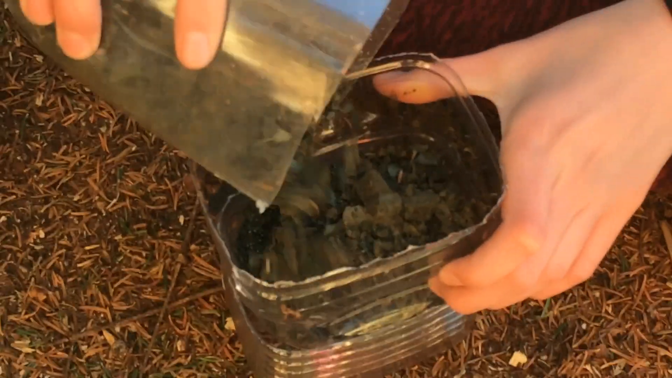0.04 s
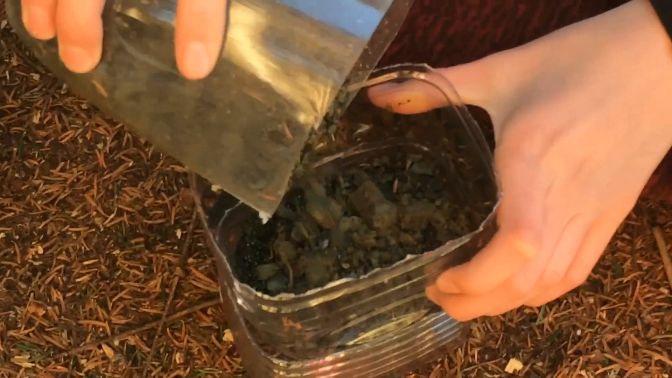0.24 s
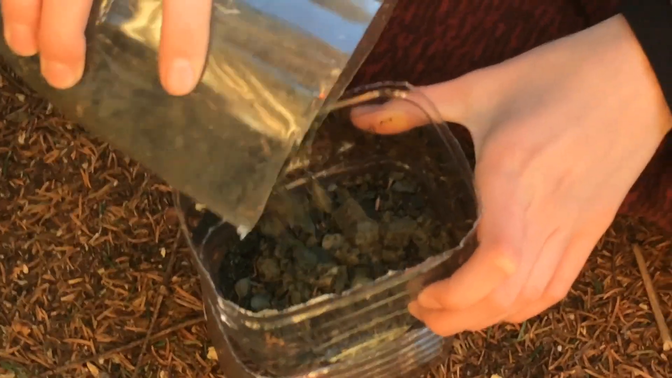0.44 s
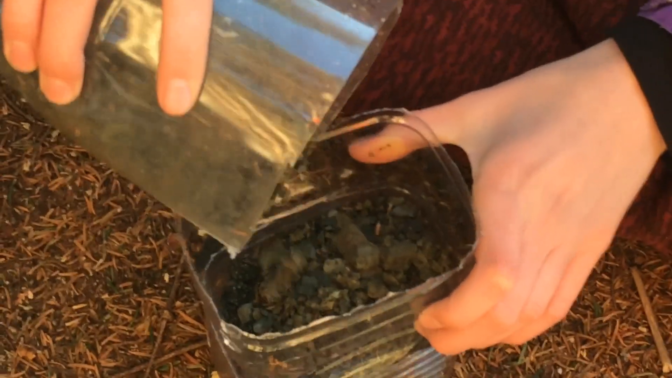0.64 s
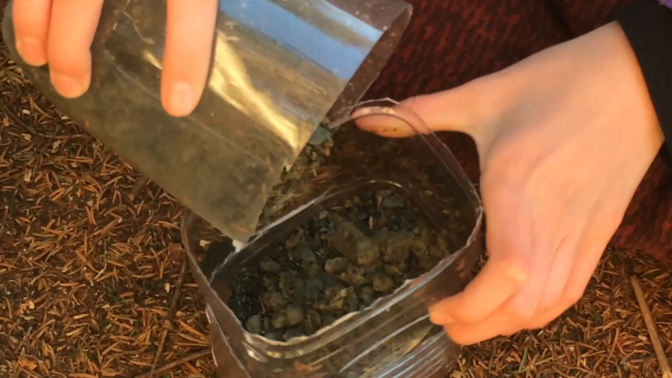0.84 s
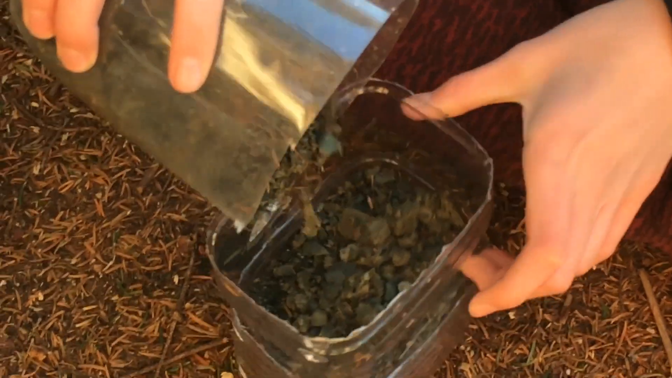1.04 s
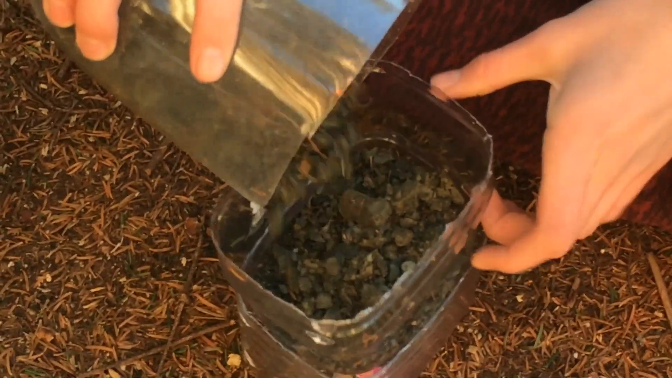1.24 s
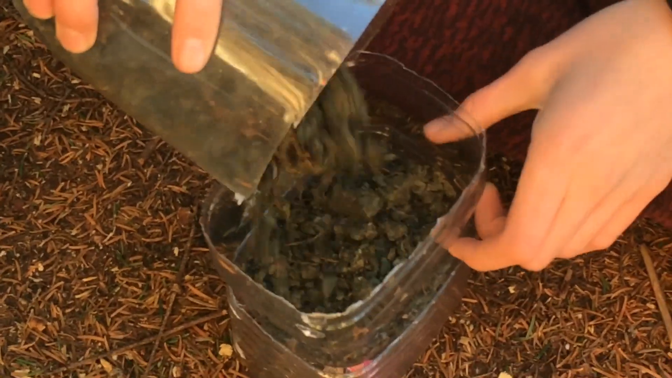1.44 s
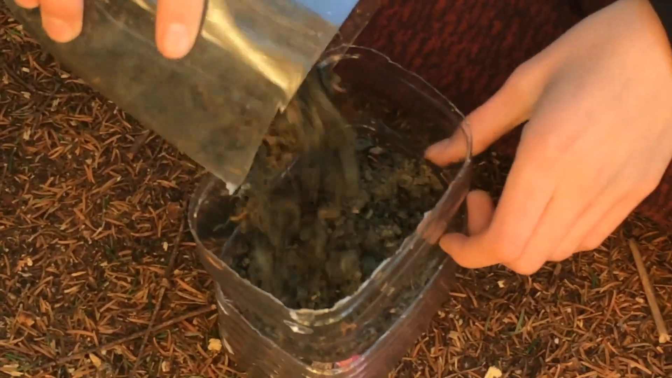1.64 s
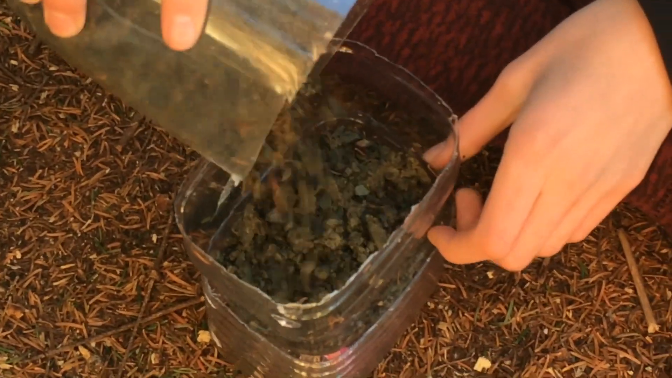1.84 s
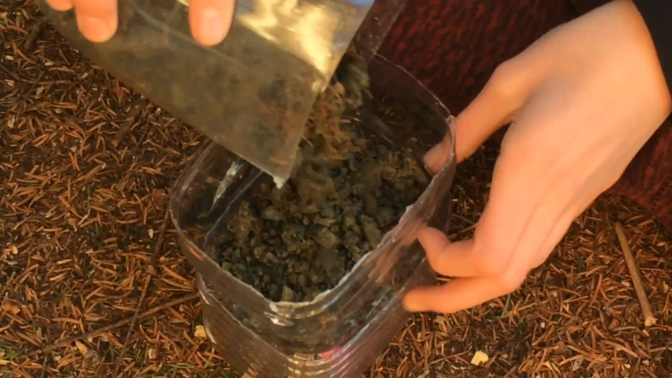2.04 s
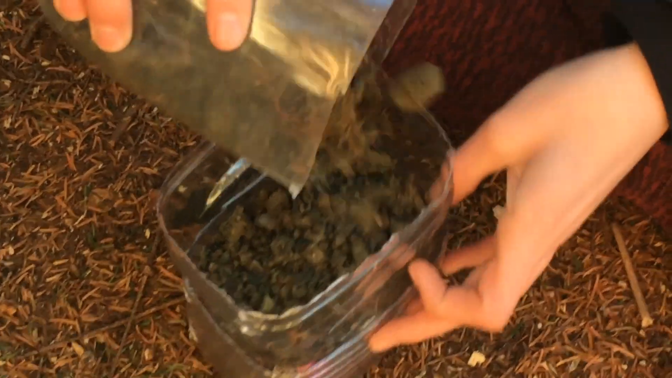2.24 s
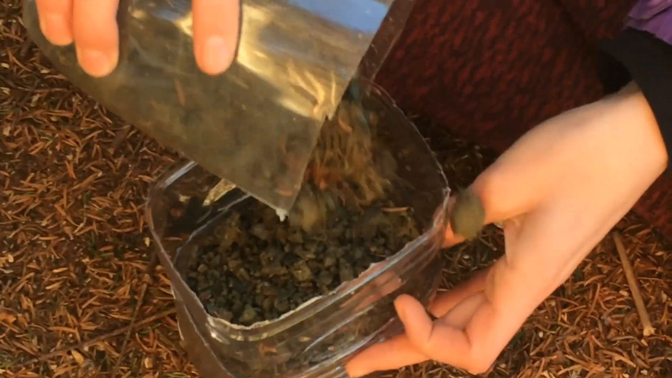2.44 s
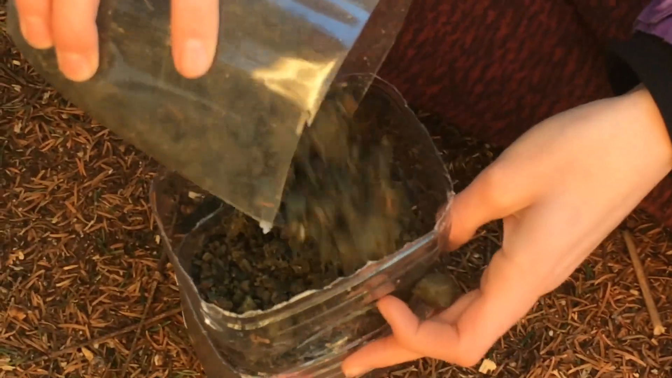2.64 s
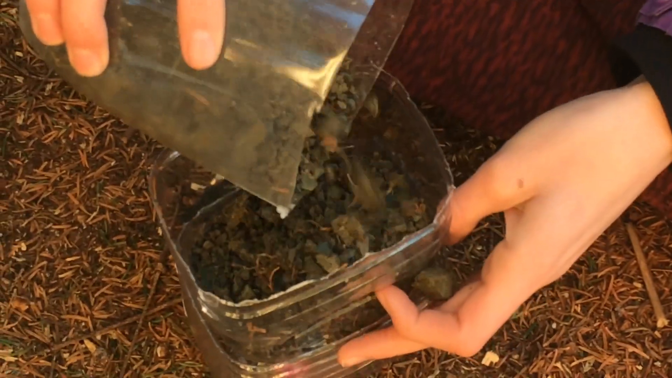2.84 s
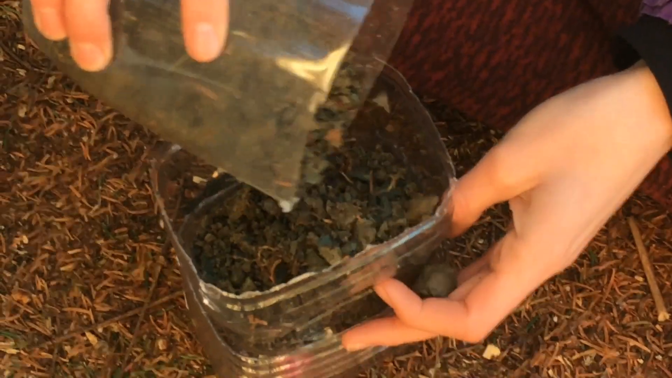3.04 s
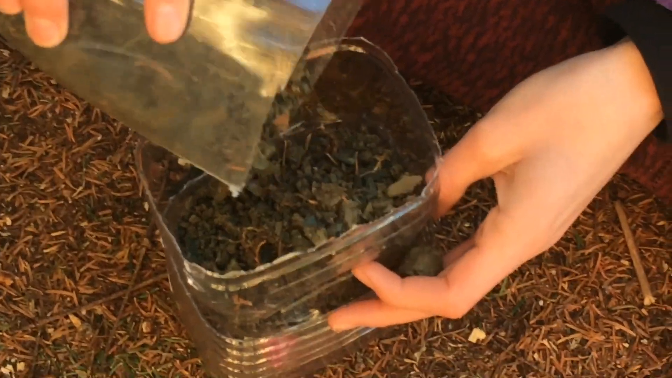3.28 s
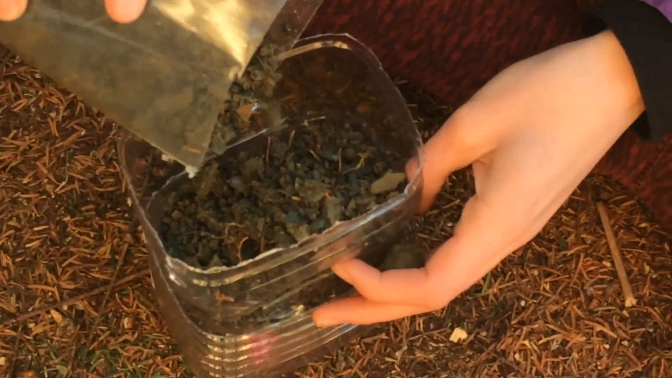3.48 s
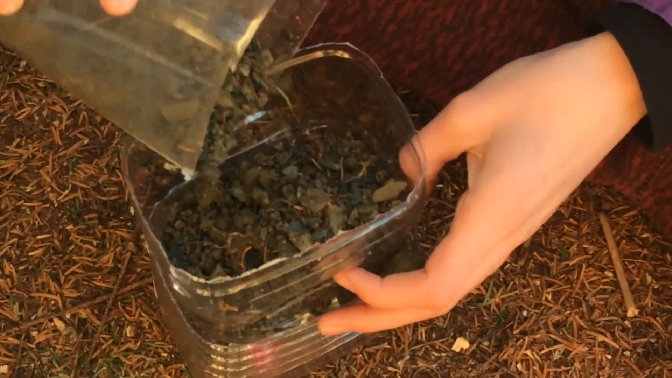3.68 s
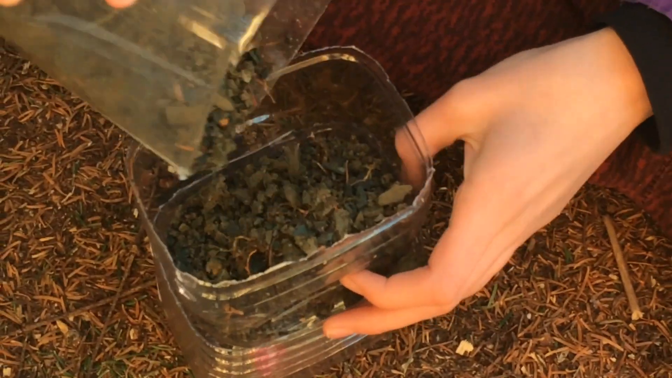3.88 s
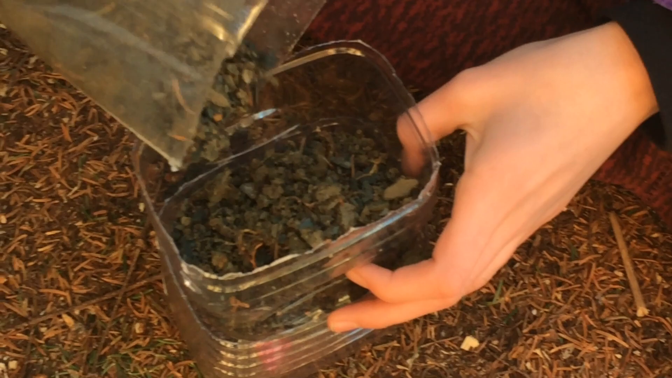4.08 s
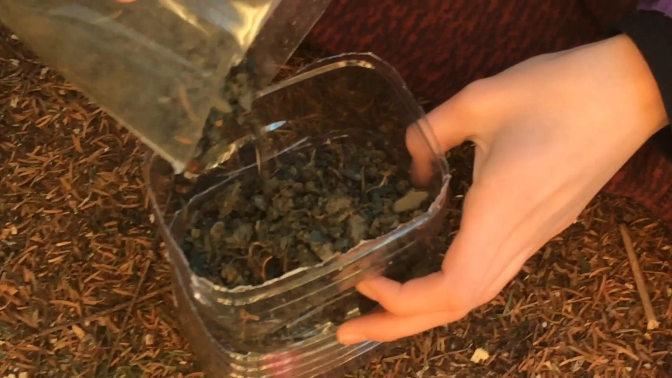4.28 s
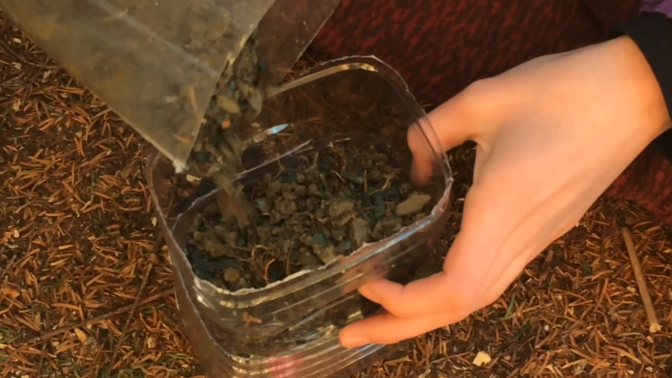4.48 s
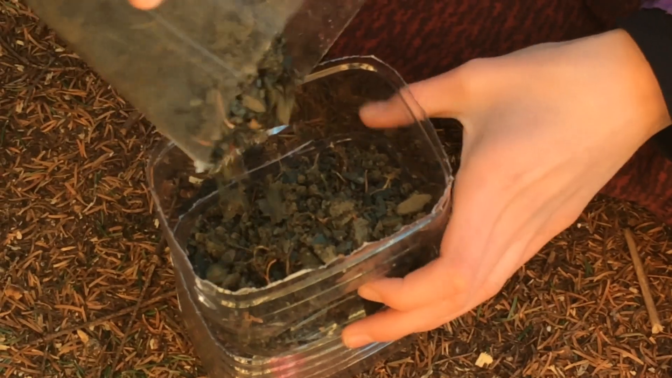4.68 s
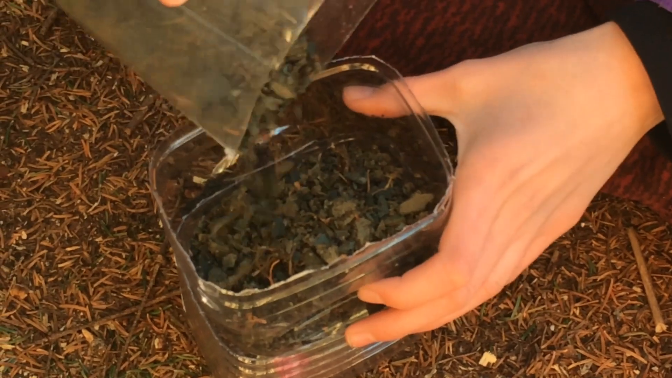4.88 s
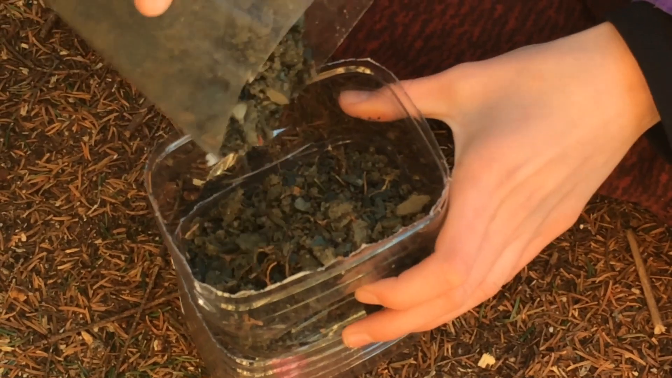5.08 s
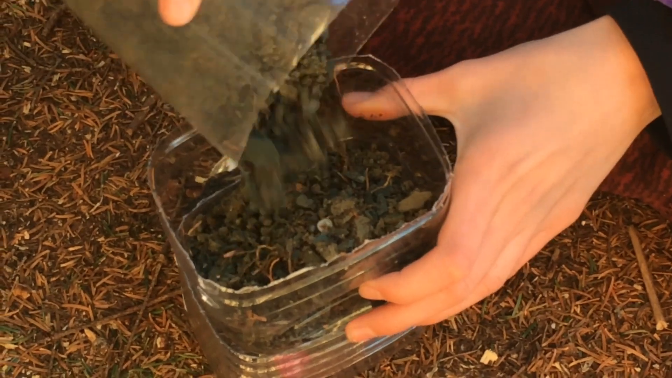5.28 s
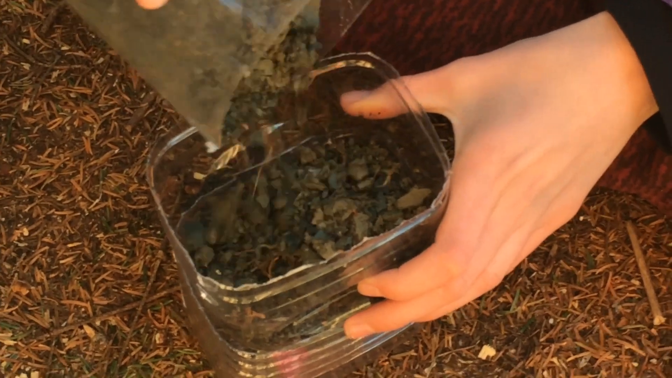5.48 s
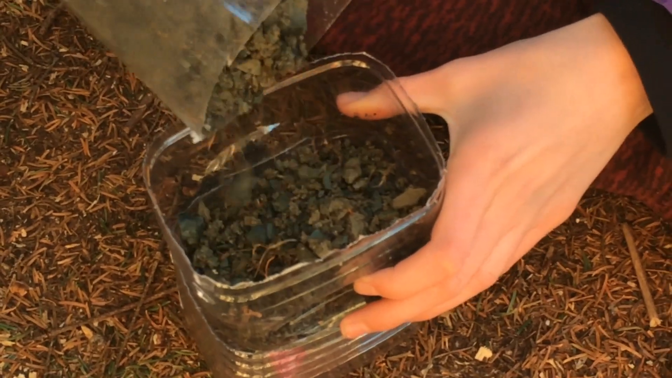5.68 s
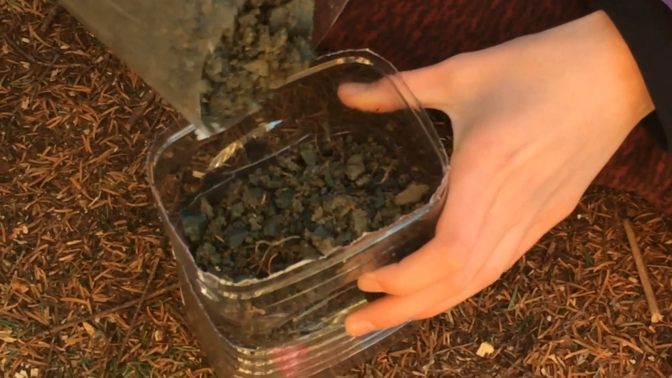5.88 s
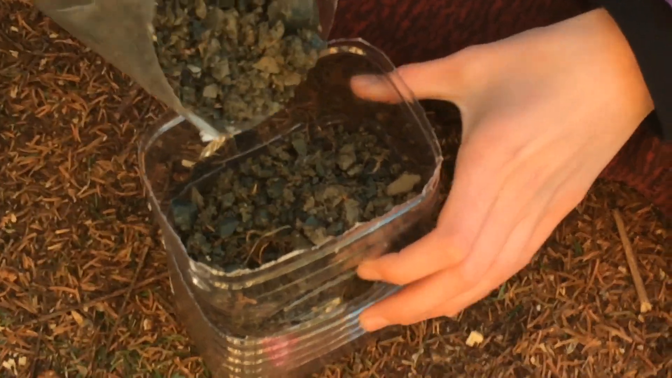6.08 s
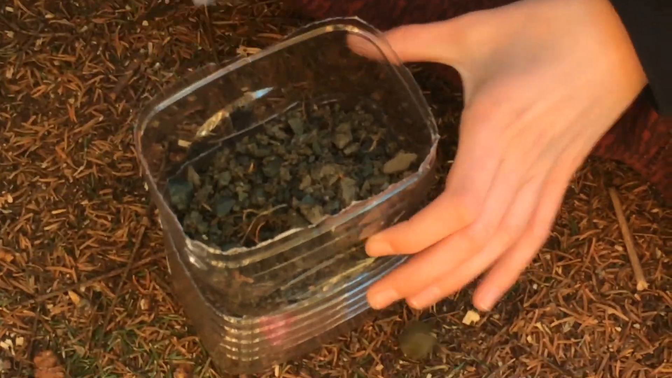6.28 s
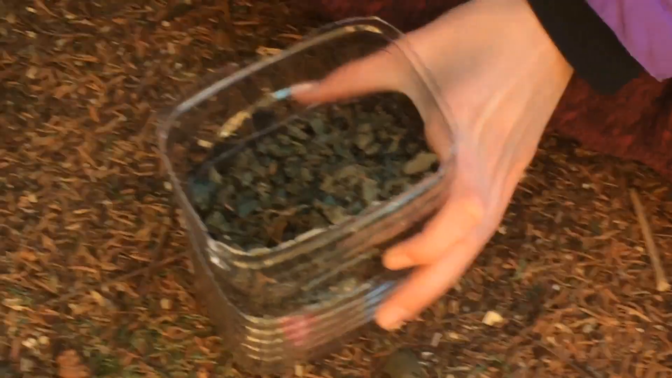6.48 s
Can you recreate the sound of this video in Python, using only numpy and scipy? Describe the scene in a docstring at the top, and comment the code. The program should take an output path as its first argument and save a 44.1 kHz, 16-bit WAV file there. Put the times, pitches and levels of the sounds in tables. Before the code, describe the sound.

Close, dry and mono outdoors, with a faint steady hush, slight low wind flutter and a few soft microphone thumps, mostly in the first second. Gravel falls into a thin-walled plastic container. From 0 to 0.6 s, bright ticks and small grit lead to a rap near 0.2 and a strong, hollow plastic clack at 0.53. It thins, with a lone knock at 0.9. Around 1.4 s the flow swells into a dense, crunchy rush of grit, raps and knocks lasting to about 3.0, with the loudest, boomy pebble knock at 2.36 and bright slides near 2.7 and 2.8. From 3.1 to 5.2 only sparse ticks, weak taps and a thin sandy trickle remain. Grit picks up at 5.3, and a tight cluster of hollow raps bursts at 5.55-5.65. Then scattered taps, a dull knock at 6.2, and a faint last trickle to about 6.5.

```python
"""Gravel poured into a bottle

Gravel is shaken out of a plastic bag into a cut-off plastic bottle that stands on the forest floor.
Single stones tick as filtered noise bursts, and rap the thin walls and knock the body as struck modes.
Fine grit runs between them in surges, as random showers of the same sounds with smooth noise for sand.
Light wind gives a low noise flutter; bumps on the microphone give separate soft low thumps, as short pulses.
Shaped noise lies behind it all as a steady hush."""
import sys
import numpy as np
from scipy import signal
from scipy.fft import rfft, irfft, next_fast_len
from scipy.io import wavfile
from scipy.ndimage import uniform_filter1d

SR = 44100
rng = np.random.default_rng(int(sys.argv[2]) if len(sys.argv) > 2 else 0)


def master_out(mix):
    """Clip the mix to full scale and print it as 16-bit PCM to the path in sys.argv[1]."""
    frames = np.transpose(np.atleast_2d(mix))
    ceiling = np.clip(frames, -1, 1)
    pcm = np.round(ceiling * 32767).astype(np.int16)
    wavfile.write(sys.argv[1], SR, pcm)


N = 287620

# Colour of stone on stone. Each row: frequency in Hz, relative level in dB.
STONE_COLOUR = [(150, -99), (1000, -13), (2800, -2.5), (5000, 1), (7200, -0.5), (9500, -5), (13000, -6),
                (16000, -14.5)]
STONE_S = .005  # a blow has the energy of an rms of 1 held this long (s)
RING_T = np.arange(3072) / SR  # time axis of one blow (s)
ROCKING_S = .0007  # spacing of the lumps as a stone settles (s)
CUTOFF_HZ = 16100


def from_db(db):
    """Decibel law: amplitude ratio of a level in dB."""
    return 10 ** (np.asarray(db) / 20)


def rms_one(x):
    """Power normalization: scales a sound to an rms of 1."""
    return x / np.sqrt(np.mean(x ** 2) + 1e-20)


def unit_blow(x):
    """Energy normalization: gives a short sound the energy of an rms of 1 held for STONE_S."""
    return x * np.sqrt(STONE_S * SR / (np.sum(x ** 2) + 1e-20))


def in_time(rows):
    """Linear interpolation: the columns of a curve table at every sample."""
    s, *columns = np.transpose(rows)
    return [np.interp(np.arange(N) / SR, s, c) for c in columns]


def gain_at(points, size):
    """Spectral envelope: gain of a (Hz, dB) spectrum on the bins of an FFT."""
    hz, db = np.transpose(points)
    bin_hz = np.arange(size // 2 + 1) * SR / size
    return from_db(np.interp(np.log(bin_hz + 1), np.log(hz), db))


def causal(x, gain):
    """Minimum-phase filtering by the folded cepstrum: nothing sounds before the contact."""
    cepstrum = irfft(np.log(gain))
    cepstrum[1:] *= 2
    cepstrum[len(cepstrum) // 2:] = 0
    return irfft(rfft(x) * np.exp(rfft(cepstrum)))


def noise(spectrum):
    """Spectral shaping: smooth noise of the given colour, at an rms of 1."""
    size = 2 * next_fast_len(N // 2 + 1)
    white = rng.standard_normal(size)
    return rms_one(irfft(rfft(white) * gain_at(spectrum, size))[:N])


def background_hush(hush_db):
    """Stationary noise: a steady background hush, with a slight bump near 2 kHz."""
    # Colour of the hush. Each row: frequency in Hz, relative level in dB.
    hush_colour = [(30, -16), (90, -3.5), (600, -5.5), (1600, -13.5), (2100, -8), (2800, -16.5),
                   (15000, -24)]
    return from_db(hush_db) * noise(hush_colour)


def wind(low_hz=45, high_hz=130):
    """Band-limited noise of varying level: light wind gives a low flutter."""
    # Level of the flutter. Each row: time in seconds, level in dB.
    flutter_level = [(0, -58), (.2, -74), (.45, -59), (.78, -66), (.87, -72), (1.45, -65.5), (3, -68),
                     (4.9, -81), (5.3, -64), (6, -73), (6.2, -78)]
    band = signal.butter(2, [low_hz, high_hz], "band", fs=SR, output="sos")
    flutter = rms_one(signal.sosfilt(band, rng.standard_normal(N)))
    return from_db(in_time(flutter_level)[0]) * flutter


def microphone_bumps(thump_s=0.0029):
    """Short low-frequency pulses: soft thumps from bumps on the microphone, each a sine in a bell envelope."""
    # Each row: centre in seconds, frequency of the sine in Hz, level of its envelope in dB.
    thump_rows = [(.03, 74, -40), (.322, 75, -44), (0.41, 87, -26), (.46, 70, -45), (0.559, 96.4, -31.5),
                  (.713, 70, -43.5), (1.199, 69.4, -48), (1.48, 130, -47), (2.675, 162, -39),
                  (5.895, 69.6, -51), (6.041, 65, -52), (6.467, 152, -42.5)]
    t = np.arange(N) / SR
    out = np.zeros(N)
    for s, hz, db in thump_rows:
        envelope = from_db(db) / np.cosh(np.clip((t - s) / thump_s, -20, 20))
        out += envelope * np.sin(2 * np.pi * hz * (t - s))
    return out


def dying(t60):
    """Exponential decay: amplitude falls by 60 dB in t60 seconds."""
    return from_db(-60 * RING_T / t60)


def scatter(t60, lumpy_db, lump_s):
    """Irregular decay: noise that dies away in uneven lumps, like a stone rocking to rest."""
    knots = np.arange(0, RING_T[-1], lump_s)
    lumps = np.interp(RING_T, knots, np.clip(rng.standard_normal(len(knots)), -2, 2))
    return rng.standard_normal(len(RING_T)) * dying(t60) * from_db(lumpy_db * lumps)


def contact(grind, grind_t60):
    """Contact force: a rough stone gives one impulse, then grinds briefly as it settles."""
    force = grind * unit_blow(scatter(grind_t60, lumpy_db=3.5, lump_s=ROCKING_S))
    force[0] += np.sqrt(STONE_S * SR)
    return force


def struck(modes, spread_db, detune, force, low_hz):
    """Modal excitation: where a stone lands decides how strongly, and at what pitch, each mode answers."""
    chance = rng.uniform(-1, 1, (len(modes), 3))
    ring = np.zeros(len(RING_T))
    for (hz, db, t60), (place, load, side) in zip(modes, chance):
        amplitude = np.sign(side) * from_db(db + spread_db * place)
        ring += amplitude * dying(t60) * np.sin(2 * np.pi * hz * (1 + detune * load) * RING_T)
    # the bottle is too small to radiate deep bass
    radiator = signal.butter(3, low_hz, "high", fs=SR, output="sos")
    driven = signal.fftconvolve(ring, force)[:len(RING_T)]
    return unit_blow(signal.sosfilt(radiator, driven))


def thud():
    """Lowest mode under load: the bottom gives under the heap."""
    # The loaded bottom. Each row: nominal frequency in Hz, level in dB, t60 in seconds.
    bottom_modes = [(260.3, 0, 0.041)]
    force = contact(grind=0, grind_t60=STONE_S)
    return struck(bottom_modes, spread_db=0, detune=0.16, force=force, low_hz=224)


def knock():
    """Damped body resonance: the hollow bottle booms briefly."""
    # The hollow body. Each row: nominal frequency in Hz, relative level in dB, t60 in seconds.
    body_modes = [(552, 0, .045), (612, 0, .052)]
    force = contact(grind=.5, grind_t60=.022)
    return struck(body_modes, spread_db=9.5, detune=0.056, force=force, low_hz=454)


def rap(heavy=0, dull_db=6.0):
    """Contact time and brightness: a heavy stone (1) stays on the wall longer than a light one (-1), so duller."""
    # Thin ribbed walls. Each row: nominal frequency in Hz, relative level in dB, t60 in seconds.
    wall_modes = [(414, -16, 0.055), (774, -6, 0.045), (847, 3, 0.022), (979, 2, 0.015), (1272, 3.5, 0.013),
                  (1390, 2.5, 0.017), (1740, 6.5, 0.012), (2095, -1, 0.014), (2490, -11, 0.018),
                  (2646, 0, 0.022), (3320, 8.5, 0.0016)]
    lowest_hz = wall_modes[0][0]
    # dull_db is the tilt in dB per octave at heavy = 1
    modes = [(hz, db - dull_db * heavy * np.log2(hz / lowest_hz), t60) for hz, db, t60 in wall_modes]
    force = contact(grind=0.73, grind_t60=0.047)
    # every mode comes as a close pair
    return struck(modes * 2, spread_db=5.5, detune=0.072, force=force, low_hz=460)


def tick(small, tail_db, bright_db=12.0, peak_db=7.5, width_hz=260):
    """Impact spectrum: a crack and short scatter at each stone's own pitches, brighter for small ones (0-1)."""
    crack_t60, scatter_t60 = .0028, .022  # s
    crack = rng.standard_normal(len(RING_T)) * dying(crack_t60)
    burst = crack + from_db(tail_db) * scatter(scatter_t60, lumpy_db=11.0, lump_s=ROCKING_S)
    hz = np.arange(len(RING_T) // 2 + 1) * SR / len(RING_T)
    pitches = rng.uniform(2394, 18600, size=(5, 1))
    own_db = (peak_db / (1 + ((hz - pitches) / width_hz) ** 2)).max(axis=0)
    # bright_db is the tilt in dB per octave at small = 1
    size_db = bright_db * small * np.log2(np.clip(hz, 4000, 13000))
    top_cut = np.where(hz < CUTOFF_HZ, 1, .1)
    gain = gain_at(STONE_COLOUR, len(RING_T)) * from_db(own_db + size_db) * top_cut
    return unit_blow(causal(burst, gain))


def falling(per_s, size_db):
    """Random arrivals of uneven size, partly evened out by their local strength."""
    sizes = from_db(size_db * np.minimum(rng.exponential(1, N), 4)) * rng.choice([-1, 1], N)
    landings = sizes * (rng.random(N) < per_s / SR)
    # local strength over 3500 samples
    return landings / np.sqrt(np.abs(uniform_filter1d(landings ** 2, size=3500)) + 0.00063)


def shower(landings, voice, count):
    """Superposition of impacts: deals the landings out to grains that each sound different; rms 1."""
    grains = [voice() for _ in range(count)]
    dealt = rng.integers(0, count, N)
    out = np.zeros(N + len(RING_T))
    for i in np.flatnonzero(landings):
        out[i:i + len(RING_T)] += landings[i] * grains[dealt[i]]
    return rms_one(out[:N])


def pour():
    """Addition of powers: levels in dB of walls, heap and sand, from the trickle plus the slides."""
    # Steady trickle over the lip of the bag. Each row: time in seconds, level in dB.
    trickle_level = [(0, -55), (.45, -58), (1.1, -61.5), (1.5, -52), (2.2, -57.5), (3.05, -53.5),
                     (3.15, -76), (3.36, -84), (3.48, -64.5), (4.1, -62.5), (4.62, -69), (4.85, -60.5),
                     (5.55, -56), (6.0, -67), (6.3, -64), (6.5, -54)]
    # Each shake lets a slide of grit go. Each row: time of full flow in seconds, time held in seconds,
    # level in dB, share on the walls in dB, share of sand in dB.
    slides = [(0.159, .04, -50, -2.5, -5), (.31, 0.027, -50, -6, -10), (.65, 0.018, -53.5, -0.5, -2),
              (.74, 0.05, -55.5, 0, -5), (1.001, 0.017, -59.5, 6.5, 0), (1.161, 0.041, -53, 0.5, -4),
              (1.375, 0.019, -42.5, -0.5, 2), (1.47, 0.16, -48, -2.5, -2), (1.6, 0.21, -42, -5, -5.5),
              (1.829, 0.19, -44.5, -9, -10), (2.109, 0.02, -51.5, 1, -5), (2.26, 0.0091, -45, -6, -15),
              (2.392, 0.14, -43, -1, -8), (2.673, 0.049, -40.5, -2, -4.5),
              (2.815, 0.049, -38.5, -1.5, -7.5), (3.96, 0.0067, -56.5, -21, -4),
              (4.452, 0.058, -59.5, 0, -13), (4.758, 0.01, -57, 5, 3), (5.327, 0.027, -51.5, -0.5, 0.5),
              (5.545, 0.0066, -47, -5, -14), (5.64, 0.022, -45, -2, -6.5)]
    gather_db_per_s, run_out_db_per_s = 226, 204
    trickle_wall_db, trickle_sand_db = -5.5, -6  # relative to the heap
    t = np.arange(N) / SR
    shares = from_db([[trickle_wall_db], [0], [trickle_sand_db]])
    power = shares ** 2 * from_db(in_time(trickle_level)[0]) ** 2
    for s, held_s, db, wall_db, sand_db in slides:
        gathering = gather_db_per_s * np.clip(s - t, 0, 1)
        running_out = run_out_db_per_s * np.clip(t - s - held_s, 0, 1)
        shares = from_db([[wall_db], [0], [sand_db]])
        power = power + shares ** 2 * from_db(db - gathering - running_out) ** 2
    return 10 * np.log10(power)


def slips(depth_db, slip_s=.025):
    """Stick and slip: a gain that swells and sinks within a few hundredths of a second."""
    lumps = np.clip(rng.standard_normal(2000), -2, 2)
    swell = np.interp(np.arange(N) / SR, slip_s * np.arange(len(lumps)), lumps)
    return rms_one(from_db(depth_db * swell))


def grit(trickle_per_s=340, heap_db=0.0, walls_db=0.0, body_db=-4.0, bottom_db=-9.5):
    """Granular flow: small grains land at random, more of them in a stronger flow, and sand slides along."""
    on_walls, on_heap, sand_db = pour()
    flow = from_db(.7 * (on_heap - np.median(on_heap)))  # 1 at the median level
    grains = falling(trickle_per_s * flow, size_db=6)
    # only pebbles are heavy enough to move the body
    pebbles = falling(50 * np.sqrt(flow), size_db=2)
    heap = shower(grains, lambda: tick(rng.random() ** 2, tail_db=-11), count=40)
    sand = from_db(sand_db) * noise(STONE_COLOUR)
    walls = from_db(walls_db) * shower(grains, rap, count=24)
    boom = from_db(body_db) * shower(pebbles, knock, count=12)
    boom = boom + from_db(bottom_db) * shower(pebbles, thud, count=8)
    # a trickle booms more, for its level, than a sliding mass
    boom = boom * from_db(-.3 * (on_walls - np.median(on_walls)))
    mix = from_db(on_heap + heap_db) * heap + sand + from_db(on_walls) * (walls + boom)
    return slips(depth_db=3.5) * mix


def answers(db, weight):
    """Division of impact energy: chips only tick, middling stones rap the wall, pebbles knock the body."""
    # Each row: weight from 0 to 1, then hollow knock, wall rap and stone tick in dB relative to the strength.
    answer_by_weight = [(0, -30, -16, 1.5), (.25, -36, -1.5, 0.5), (0.498, -20.5, 2.5, -10.5),
                        (.75, -4, 0.5, -11.5), (1, 3, -13, -20)]
    weights, *shares = np.transpose(answer_by_weight)
    return [db + np.interp(weight, weights, share) for share in shares]


def stones(knock_db=-0.5, rap_db=0.0, tick_db=2.5, thud_db=-53.5, thud_growth=0.25, usual_db=-53.5):
    """Superposed responses: each stone, chip to pebble, sounds body, bottom, wall and tick in its own proportions."""
    # Single stones. Each row: start in seconds, strength in dB, weight from 0 (light chip) to 1 (heavy pebble).
    single_stones = [(0.013, -44.5, 0.91), (0.031, -41, 0), (.0858, -46.5, .95), (.131, -45.5, 0.86),
                     (0.1709, -35.5, 0.18), (0.2009, -37.5, 0.13), (.2062, -28, 0.36),
                     (0.2166, -35.5, 0.06), (0.2904, -35, .38), (0.3171, -44, 0.62), (0.369, -43, 0.03),
                     (0.491, -42.5, 0.47), (0.5332, -22.5, 0.65), (0.5685, -34.5, 0.59),
                     (.6456, -46.5, 0.86), (0.7429, -43.5, 0), (0.7686, -43.5, 0), (0.8956, -30.5, 0.76),
                     (0.9503, -47, 0.26), (1.005, -48, 0.8), (1.196, -48, 0.93), (1.2722, -39.5, 0.13),
                     (1.3097, -42, 0.1), (1.3591, -40.5, 0.97), (1.4505, -40, 0.01), (1.488, -40.5, 0.16),
                     (1.5639, -30.5, 0.61), (1.5738, -37, 0.24), (1.5943, -38.5, 0.37),
                     (1.6056, -28.5, 0.53), (1.614, -33.5, 0.5), (1.6269, -35.5, 0.07), (1.6715, -36.5, .5),
                     (1.7281, -34, 0.72), (1.795, -36, 0.13), (1.889, -33.5, 0.81), (1.9186, -32, 0.21),
                     (1.9533, -34.5, .3), (1.969, -27, 0.65), (1.979, -26.5, 0.55), (2.0015, -30, 0.5),
                     (2.039, -36.5, .5), (2.112, -37.5, 0.58), (2.1446, -32, 0.32), (2.251, -29, 0.29),
                     (2.255, -34, 0.3), (2.2774, -32.5, 0.14), (2.357, -18, .92), (2.4128, -38, 0.97),
                     (2.434, -33, 0.74), (2.4537, -39, 0.1), (2.4734, -33.5, 0.44), (2.4875, -35.5, 0.1),
                     (2.5103, -32.5, 0.93), (2.522, -34.5, 0.98), (2.669, -32.5, 0.7), (2.676, -29, 0.67),
                     (2.6978, -34, 0.17), (2.7496, -36.5, .08), (2.807, -35, 0.52), (2.8544, -34, 0.77),
                     (2.91, -38.5, 0.11), (2.9318, -42, 0), (2.9546, -41.5, 0), (2.9651, -35.5, .22),
                     (2.9791, -31, 0.42), (2.992, -42, 0.1), (3.0347, -34, 0.37), (3.0632, -45.5, 0.18),
                     (3.128, -52, 0), (3.158, -45, 0), (3.1926, -37.5, 0.8), (3.2618, -49.5, 0.99),
                     (3.399, -48.5, 0.81), (3.442, -36.5, 0.96), (3.611, -45.5, 0.92),
                     (3.7399, -45.5, 0.84), (3.785, -49, 0.99), (3.826, -43.5, 0.2), (3.9349, -49.5, 0.83),
                     (3.9688, -45.5, 0.15), (4.0047, -44, 0.33), (4.0889, -48, 0.82), (4.137, -52, 0.27),
                     (4.2599, -49, 0.82), (4.3268, -41, 0.18), (4.4065, -49, 0), (4.426, -46.5, 0.28),
                     (4.4527, -42.5, 0.51), (4.735, -43.5, 0.11), (4.758, -50, 0.14), (4.7746, -40.5, 0.79),
                     (4.787, -42.5, 0.87), (4.8834, -54, 0.1), (4.9457, -45, 0.17), (5.0337, -46.5, 0),
                     (5.0484, -53, .22), (5.053, -52, 0.75), (5.2, -46.5, 0.85), (5.2344, -44, 0.82),
                     (5.2736, -35, 0.36), (5.3182, -41, 0.15), (5.3642, -42.5, 0.92), (5.417, -43, .95),
                     (5.4826, -45, 0.42), (5.526, -45, 0), (5.5614, -29.5, 0.75), (5.6103, -27.5, 0.71),
                     (5.622, -26, 0.75), (5.631, -28, 0.68), (5.719, -43.5, 0.78), (5.7348, -38, 0.21),
                     (5.7975, -47.5, 0.86), (5.822, -43.5, 0.1), (5.8973, -49.5, 0), (5.918, -35.5, 0.83),
                     (6.2045, -36, 0.95), (6.2048, -40.5, 0.27), (6.4456, -46.5, 0.14),
                     (6.4547, -48.5, 0.19)]
    out = np.zeros(N + len(RING_T))
    for s, db, weight in single_stones:
        body_db, wall_db, stone_db = answers(db, weight)
        # light chips hardly move the wall, heavy stones shake the whole body
        small = np.clip((stone_db - wall_db - 5.0) / 12, 0, 1)
        heavy = np.clip((body_db - wall_db + 28.5) / 14, -1, 1)
        # a slow stone stays in contact longer, so the lowest mode weighs more in soft blows
        bottom_db = min(body_db, thud_db + thud_growth * (body_db - usual_db))
        blow = from_db(body_db + knock_db) * knock()
        blow = blow + from_db(bottom_db) * thud()
        blow = blow + from_db(wall_db + rap_db) * rap(heavy)
        blow = blow + from_db(stone_db + tick_db) * tick(small, tail_db=-6)
        start = int(s * SR)
        out[start:start + len(blow)] += blow
    return out[:N]


def scene(hush_db=-63.5):
    """Linear superposition: hush, wind, bumps, grit and stones add up in one channel."""
    return (background_hush(hush_db) + wind() + microphone_bumps() + grit() + stones())[None]


def record(dry, low_cut_hz=38):
    """Band limiting: the microphone sheds the deepest bass, and the top is cut steeply."""
    bass_cut = signal.butter(2, low_cut_hz, "high", fs=SR, output="sos")
    top_cut = signal.ellip(10, .2, 80, CUTOFF_HZ, fs=SR, output="sos")
    return signal.sosfilt(top_cut, signal.sosfilt(bass_cut, dry))


dry = scene()
out = record(dry)
master_out(out)
```